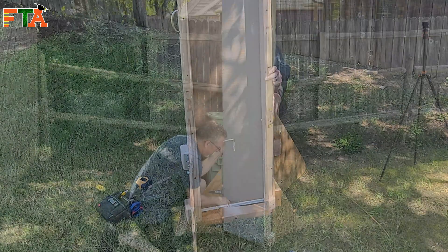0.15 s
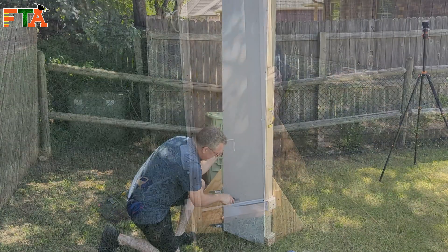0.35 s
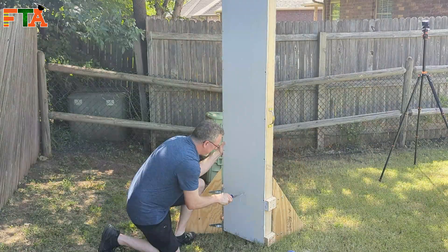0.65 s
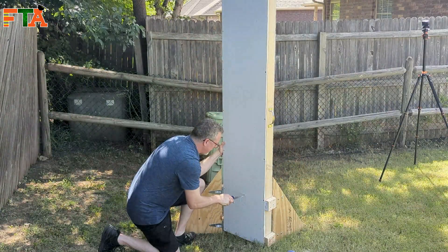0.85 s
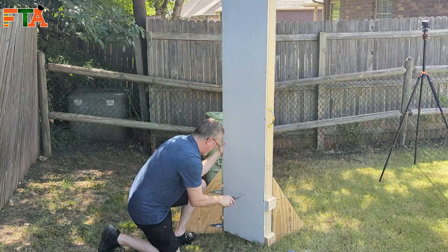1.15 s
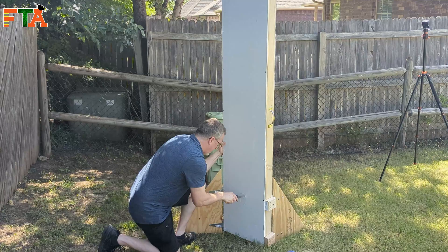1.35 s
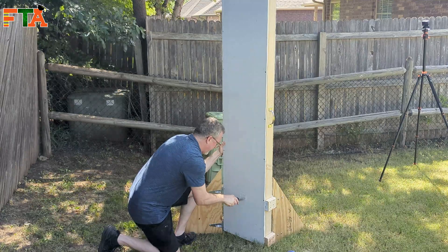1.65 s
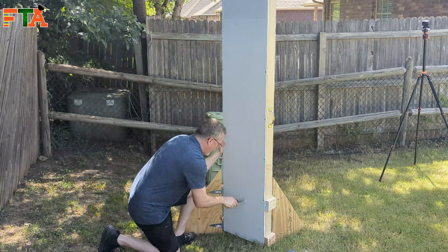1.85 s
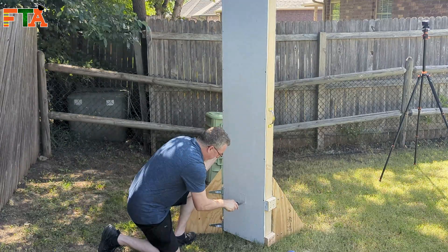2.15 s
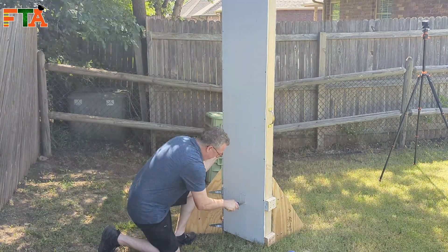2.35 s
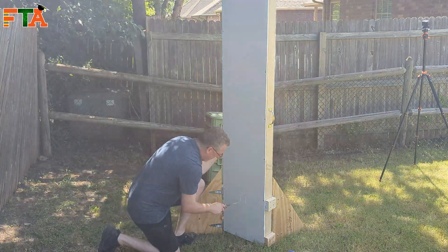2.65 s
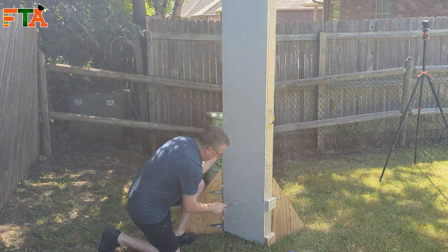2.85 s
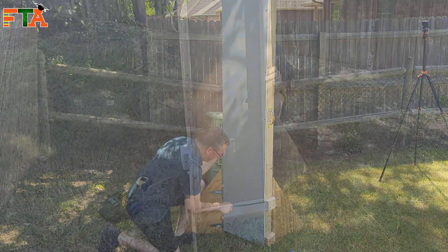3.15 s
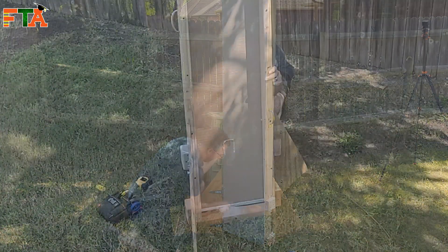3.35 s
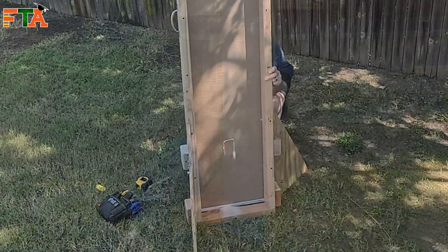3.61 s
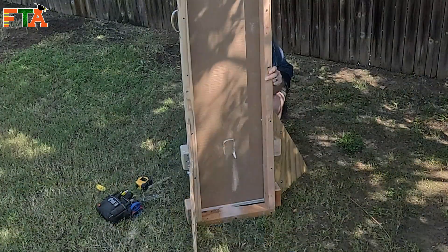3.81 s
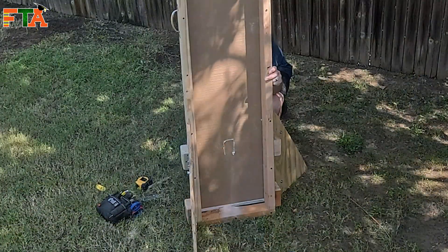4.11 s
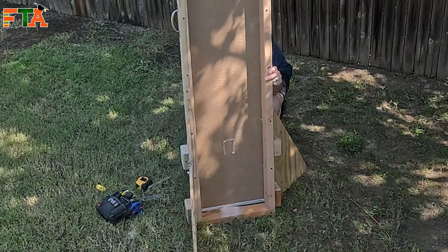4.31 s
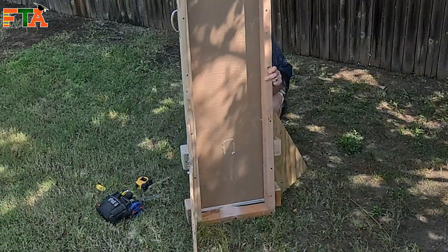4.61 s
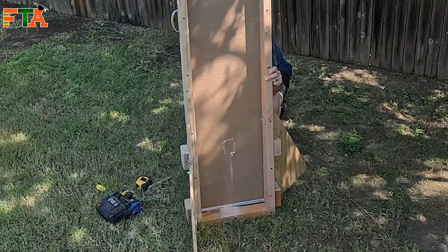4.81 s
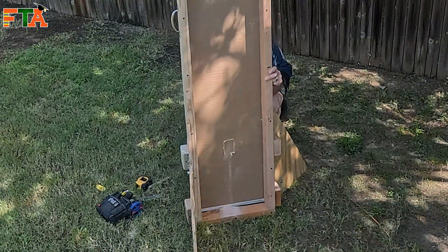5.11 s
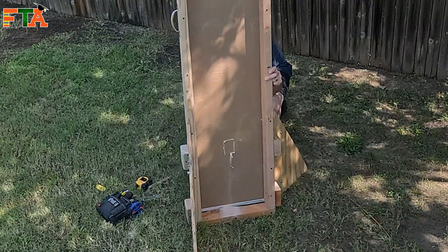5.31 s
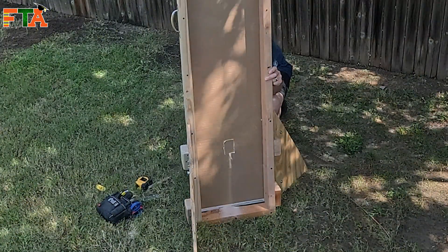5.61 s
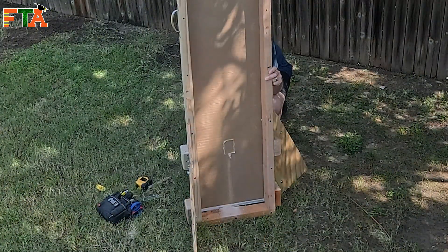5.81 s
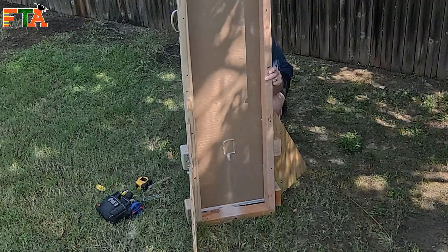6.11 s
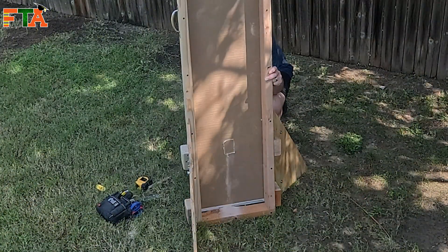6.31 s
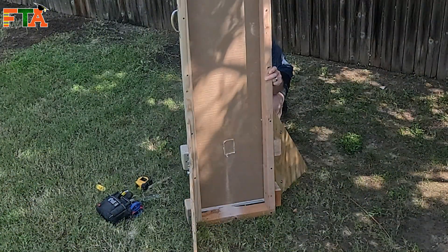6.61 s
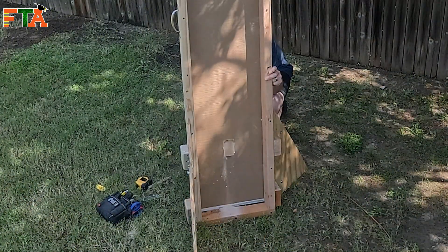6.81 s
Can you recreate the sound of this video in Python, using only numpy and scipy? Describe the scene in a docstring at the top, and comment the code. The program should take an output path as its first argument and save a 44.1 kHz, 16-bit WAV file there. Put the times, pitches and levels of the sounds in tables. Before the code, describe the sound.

In a quiet yard, a pointed saw jabs at a hollow drywall panel: faint ticks, a short scratchy burst, then a longer run of fast, even to-and-fro scrapes that fades out. After a soft bump and thin rustling, the sound shifts behind the panel, where fuller sawing begins, each stroke a buzzing rasp with hollow boom, thuds and snapping chips. Two bright squeaks chirp midway. Close, mono, with a faint dull outdoor echo.

```python
"""Jab saw on a hollow drywall

A stud wall stands in a quiet yard. From the front, the saw's tip scratches to and fro in short jabs.
From behind, longer strokes follow: a train of tooth impulses drives the modes of sheet and frame,
and noise grains make the gypsum's rasp. Chips snap as dispersive bending waves, bites thud, and
stick-slip squeaks are chirps. Filtered noise forms the air, a decaying noise tail the fences' echo."""
import sys
import numpy as np
from scipy import signal
from scipy.fft import rfft, irfft, next_fast_len
from scipy.io import wavfile
from scipy.ndimage import uniform_filter1d, map_coordinates

SR = 44100
rng = np.random.default_rng(int(sys.argv[2]) if len(sys.argv) > 2 else 0)


def digitize_waveform(pressure):
    """Quantize a signal to 16-bit integers and store it at the path in sys.argv[1].

    Rows of a 2-D input are taken as channels; values are limited to [-1, 1].
    """
    field = np.atleast_2d(pressure).T
    bounded = np.clip(field, -1, 1)
    quanta = np.round(bounded * 32767).astype(np.int16)
    wavfile.write(sys.argv[1], SR, quanta)


N = 306936
TIME = np.arange(N) / SR


def amp(db):
    """Decibels express the logarithm of an amplitude ratio."""
    return 10 ** (np.asarray(db) / 20)


def unit(x):
    """Normalization to an rms of 1 separates a signal's level from its shape."""
    return x / np.sqrt(np.mean(x ** 2) + 1e-20)


def along(points, hz):
    """Interpolation on a logarithmic frequency axis joins (hz, value) points."""
    point_hz, values = np.transpose(points)
    return np.interp(np.log(hz + 1), np.log(point_hz + 1), values)


def filtered(x, response):
    """A linear filter multiplies the spectrum by a response of frequency."""
    size = next_fast_len(len(x) + SR // 2)
    hz = np.fft.rfftfreq(size, 1 / SR)
    return irfft(rfft(x, size) * response(hz), size)[:len(x)]


def through(x, response):
    """Convolution passes x through an impulse response scaled to unit energy."""
    return signal.fftconvolve(x, response / np.linalg.norm(response))[:N]


def add(track, s, sound):
    """Superposition mixes a sound into the track at time s."""
    start = max(round(s * SR), 0)
    part = track[start:start + len(sound)]
    part += sound[:len(part)]


def click(spectrum, size=8192):
    """Minimum phase, by cepstral folding: a causal impulse of unit energy with this spectrum."""
    magnitude = amp(along(spectrum, np.fft.rfftfreq(size, 1 / SR)))
    cepstrum = irfft(np.log(np.maximum(magnitude, 1e-6)))
    cepstrum[1:size // 2] *= 2
    cepstrum[size // 2 + 1:] = 0
    pulse = irfft(np.exp(rfft(cepstrum)))
    return pulse / np.linalg.norm(pulse)


def ringing(modes, size=16384):
    """Modal superposition: damped sines, neighbours opposite in sign, unit energy in all."""
    t = np.arange(size) / SR
    ring = np.zeros(size)
    for k, (hz, db, t60) in enumerate(modes):
        ring += (-1) ** k * amp(db - 60 * t / t60) * np.sin(2 * np.pi * hz * t)
    return ring / np.linalg.norm(ring)


def crumbs(rate, scatter_db):
    """Granular noise: gypsum grains break at random moments with random strengths, rms 1."""
    size = amp(scatter_db * np.clip(rng.standard_normal(N), -2, 2))
    breaks = rng.random(N) < rate / SR
    return unit(breaks * size * rng.choice([-1, 1], N))


def wobble(rate):
    """Random modulation: a smooth curve through normal knots, rate of them a second."""
    knots = rng.standard_normal(int(N * rate / SR) + 4)
    return map_coordinates(knots, [TIME * rate])


def hush(levels, spectrum, patchy_db):
    """Filtered noise: outdoor rumble and hiss, wavering in patches of time and frequency."""
    z = signal.stft(rng.standard_normal(N), nperseg=512)[2]
    field = uniform_filter1d(rng.standard_normal(z.shape), size=5, axis=0)
    field = uniform_filter1d(field, size=9, axis=1)
    patches = signal.istft(z * amp(patchy_db * unit(field)), nperseg=512)[1][:N]
    air = unit(filtered(patches, lambda hz: amp(along(spectrum, hz))))
    return amp(np.interp(TIME, *np.transpose(levels)) + 0.23 * wobble(24)) * air


# level of the yard's air at the opening, in front and behind: time_s, level_db
OPENING_LEVELS = [(0, -57.5), (.22, -61), (.245, -96), (.28, -110)]
FRONT_LEVELS = [(.17, -110), (.215, -64.5), (.9, -70), (2.7, -68), (3.345, -69.5), (3.39, -110)]
BACK_LEVELS = [(3.3, -110), (3.345, -65), (3.6, -66), (3.85, -64.5), (6.96, -63.5)]
# spectrum of the air in each of these: frequency_hz, relative_level_db
OPENING_AIR = [(18, -56), (30, -18), (54, -12), (164, -9.5), (345, -15.5), (383, -25), (482, -14.5),
               (640, -21), (786, -22), (1040, -37), (2920, -34), (6150, -25), (11700, -48), (14000, -54)]
FRONT_AIR = [(35, -78), (60, -31), (153, -24.5), (338, -13.5), (398, -10.5), (437, -12.5), (566, -13.5),
             (1200, -24.5), (1510, -30.5), (2770, -30.5), (5210, -41.5), (16000, -49)]
BACK_AIR = [(30, -24), (85, 2), (200, -0.5), (400, -7.5), (650, -5.5), (1200, -18), (2000, -20),
            (3000, -20), (3900, -15.5), (4700, -14.5), (6000, -18), (9000, -27), (14000, -37.5)]


def yard():
    """Ambient noise depends on the standpoint: each air has its own spectrum and level curve."""
    opening = hush(OPENING_LEVELS, OPENING_AIR, patchy_db=4.0)
    front = hush(FRONT_LEVELS, FRONT_AIR, patchy_db=2.5)
    back = hush(BACK_LEVELS, BACK_AIR, patchy_db=2.2)
    return opening + front + back


def fences(x, level_db=-23, delay_s=0.064, t60_s=1, corner_hz=800):
    """Late reflection: the fences around the yard send back a faint, dull, decaying tail."""
    t = TIME[:SR // 2]
    tail = rng.standard_normal(len(t)) * amp(-60 * t / t60_s) * (t > delay_s)
    return amp(level_db) * filtered(through(x, tail), lambda hz: 1 / (1 + (hz / corner_hz) ** 2))


# the blade skims the face with hardly any pressure: start_s, end_s, level_db
GRAZES = [(0.232, 0.262, -70.5), (0.967, 1.186, -71), (3.022, 3.203, -73), (3.168, 3.35, -71)]
# single teeth skip over the paint: start_s, level_db
SKIPS = [(0.253, -57), (0.288, -56), (0.305, -56), (0.99, -67), (1.023, -67), (1.052, -62), (1.098, -66),
         (1.169, -65), (3.051, -68), (3.066, -61), (3.076, -64), (3.108, -65), (3.129, -69), (3.151, -66),
         (3.17, -61), (3.178, -66), (3.214, -57), (3.227, -63), (3.253, -60.5), (3.274, -55), (3.304, -58),
         (3.316, -57)]
# spectrum of the light scratching: frequency_hz, relative_level_db
GRAZE_COLOUR = [(400, -19), (900, 1.5), (1400, -10.5), (2000, 1), (2500, -10), (3300, -13), (5000, -22.5),
                (8700, -21.5), (16000, -21)]


def grazes(skip_t60_s=0.031):
    """Light friction: noise grains under a pressure curve give scratches over a thin rustle."""
    pressure, t = np.zeros(N), TIME[:SR // 20]
    for start, end, db in GRAZES:
        add(pressure, start, amp(db) * signal.windows.tukey(int((end - start) * SR), .3))
    for s, db in SKIPS:
        add(pressure, s, amp(db - 60 * t / skip_t60_s))
    return through(pressure * crumbs(rate=2200, scatter_db=4.0), click(GRAZE_COLOUR))


# the handle bumps softly against the face: start_s, peak_db
BUMPS = [(2.781, -50.5)]
# modes of the painted face, stirred by bumps and by the tip: frequency_hz, level_db, t60_s
FACE_MODES = [(251, 0, 0.12), (342, 0.5, 0.14), (681, 6.5, 0.041), (837, -4, 0.073), (1197, 3, 0.051),
              (1850, -25.5, 0.05), (1933, -6, 0.099)]


def bumps():
    """Selective excitation: a soft contact favours the face's modes around 800 Hz."""
    thud = filtered(ringing(FACE_MODES), lambda hz: np.exp(-np.log((hz + 1) / 800) ** 2 / 0.16))
    out = np.zeros(N)
    for s, db in BUMPS:
        add(out, s, amp(db) * thud / np.abs(thud).max())
    return out


def board(x, spectrum, decay, tail_db, size=8192):
    """Diffuse reverberation: x gains a dense tail, redrawn every size / 2 samples, and a colour."""
    tails = np.zeros(N)
    for start in range(0, N, size // 2):
        piece = x[start:start + size // 2]
        if piece.any():
            hz, t, z = signal.stft(rng.standard_normal(size), SR, nperseg=128)
            t60 = along(decay, hz)[:, None]
            # equal energy in every band, however long it rings
            z = z * amp(-60 * t / t60) / np.sqrt(t60)
            tail = signal.istft(z, SR, nperseg=128)[1]
            add(tails, start / SR, signal.fftconvolve(piece, tail / np.linalg.norm(tail)))
    mixed = (x + amp(tail_db) * tails) / np.hypot(1, amp(tail_db))
    return through(mixed, click(spectrum))


def cutting(rate, jitter, puff_db, uneven_db):
    """Periodic impulses shed grains: returns teeth passed, their pulses and the puffs of crumbs."""
    travel = np.cumsum(rate * np.exp(jitter * wobble(140))) / SR
    passing = np.diff(np.floor(travel), prepend=0)
    # pulses and puffs both come out near rms 1
    teeth = passing * np.sqrt(SR / np.maximum(rate, 1)) * amp(0.46 * wobble(200))
    puff_fall = amp(-puff_db * (travel % 1) + uneven_db * wobble(250))
    puffs = crumbs(rate=11000, scatter_db=2) * puff_fall
    # the hand keeps a steady pressure over a few teeth
    pressure = np.sqrt(np.abs(uniform_filter1d(puffs ** 2, size=400)) + 1e-6)
    return travel, teeth, puffs / pressure


# quick to-and-fro jabs of the tip: full_speed_s, level_db, length_s
JABS = [(0.382, -41, 0.011), (0.418, -45.5, 0.021), (0.48, -36, 0.017), (0.507, -34, 0.01),
        (0.536, -39.5, 0.017), (0.564, -37, 0.017), (0.599, -36, 0.02), (0.657, -43.5, 0.015),
        (1.135, -55, 0.0096), (1.264, -28.5, 0.023), (1.288, -38, 0.02), (1.34, -33, 0.019),
        (1.372, -38.5, 0.012), (1.407, -37.5, 0.018), (1.441, -29, 0.022), (1.476, -31.5, 0.013),
        (1.511, -30, 0.015), (1.547, -31, 0.014), (1.58, -29, 0.013), (1.618, -29, 0.015),
        (1.647, -26.5, 0.014), (1.683, -34, 0.014), (1.715, -29, 0.018), (1.75, -33.5, 0.014),
        (1.786, -30, 0.017), (1.822, -32, 0.02), (1.855, -29, 0.015), (1.892, -31, 0.013),
        (1.929, -32.5, 0.02), (1.961, -38.5, 0.013), (1.999, -31, 0.016), (2.031, -38, 0.013),
        (2.071, -30.5, 0.018), (2.103, -30, 0.012), (2.137, -31, 0.016), (2.174, -33, 0.018),
        (2.199, -38, 0.022), (2.232, -45, 0.015), (2.26, -45.5, 0.017), (2.299, -39.5, 0.015),
        (2.325, -38, 0.022), (2.389, -44, 0.017), (2.433, -42, 0.017), (2.467, -42, 0.02),
        (2.492, -42, 0.0095), (2.54, -45, 0.024)]
# the tip knocks as it is set down or turns round: start_s, level_db (before the tap gains)
TAPS = [(0.371, -30), (0.409, -30), (0.46, -34), (1.133, -53), (1.21, -26.5), (1.233, -31), (1.259, -22),
        (1.325, -36), (1.4317, -25), (1.471, -28), (1.499, -34), (1.5362, -24), (1.567, -26), (1.602, -36),
        (1.635, -33), (1.676, -28), (1.709, -27.5), (1.779, -27), (1.8195, -24), (1.849, -15), (1.883, -20),
        (1.989, -50), (2.058, -26)]
# spectra of the scraped face and of the flying grit: frequency_hz, relative_level_db
SCRAPE_COLOUR = [(41, -76), (70, -41), (176, -24.5), (259, -1), (348, -6), (484, -7.5), (662, -1.5),
                 (860, 2), (1080, -11), (1200, -8.5), (1380, -11.5), (1950, -3.5), (2620, -17),
                 (3010, -10.5), (4500, -31.5), (5850, -63), (9900, -120)]
GRIT_COLOUR = [(2060, -41), (3500, 2), (4550, -8), (5050, -3.5), (6300, -12), (6900, -9), (7900, -12),
               (8900, -4), (9450, -11.5), (10200, -11), (12800, -9.5), (16000, -16.5)]
# how long the face rings: frequency_hz, t60_s
FACE_RING = [(200, 0.019), (1000, 0.19), (4000, 0.018), (12000, 0.033)]


def jabs(grit_tail_db=-8, face_tail_db=-7, modes_db=-8, pulse_share=0.24):
    """Impulsive friction: evenly spaced teeth knock the face and throw crisp puffs of grit."""
    drag_lead_s = 0.0013  # the face takes the load this long before the grit flies
    fall_ratio, roundness = 0.84, 1.626  # a jab's fall against its rise, and its shape
    grit_db = -13.5  # grit against scrape
    tap_db, tap_grit_db = 9, -17.5  # a tap's blow to the face, and its grit against that blow
    grit_power, drag_power, taps = np.zeros((3, N))
    for s, db, length in JABS:
        near = slice(int((s - .1) * SR), int((s + .1) * SR))
        for power, middle in ((grit_power, s), (drag_power, s - drag_lead_s)):
            before, after = middle - TIME[near], (TIME[near] - middle) / fall_ratio
            away = np.maximum(before, after) / (length / 2)
            power[near] += amp(db) ** 2 * np.exp(-away ** roundness)
    for s, db in TAPS:
        add(taps, s, amp([db + tap_db]))
    teeth_hz = np.full(N, 315)
    _, teeth, breaking = cutting(teeth_hz, jitter=.06, puff_db=17, uneven_db=3.5)
    drag = unit(breaking + pulse_share * teeth) * np.sqrt(drag_power) * amp(-1.07) + taps
    face = board(drag, SCRAPE_COLOUR, FACE_RING, tail_db=face_tail_db)
    face = face + amp(modes_db) * through(drag, ringing(FACE_MODES))
    # the small patch around the tip hardly radiates bass
    face = filtered(face, lambda hz: 1 - 1 / (1 + (hz / 150) ** 3))
    grit = amp(grit_db) * breaking * np.sqrt(grit_power) + amp(tap_grit_db) * taps
    dust = board(grit, GRIT_COLOUR, FACE_RING, tail_db=grit_tail_db)
    return amp(-1.5) * face + amp(1.0) * dust


# chirps of the binding blade: middle_s, length_s, pitch_hz (at the middle), peak_db
SQUEAKS = [(5.2533, 0.0094, 5096, -13.5), (5.285, 0.013, 5090, -41), (5.303, 0.016, 5150, -38),
           (5.321, 0.0043, 5870, -37), (5.328, 0.0091, 5040, -14), (5.628, 0.007, 5050, -32.5)]


def squeaks(droop=0.039, second_db=-27, third_db=-42, ring_db=-26, t60=0.14):
    """Stick-slip: brief, nearly pure chirps sag in pitch and leave a faint ring."""
    out = np.zeros(N)
    for s, length, hz, db in SQUEAKS:
        u = np.linspace(-1, 1, int(length * SR))
        phase = 2 * np.pi * np.cumsum(hz * (1 - droop * u)) / SR
        tone = np.sin(phase) + amp(second_db) * np.sin(2 * phase) + amp(third_db) * np.sin(3 * phase)
        add(out, s - length / 2, amp(db) * np.cos(np.pi * u / 2) ** 2 * tone)
    t = TIME[:SR // 4]
    ring = rng.standard_normal(len(t)) * amp(-60 * t / t60)
    return out + amp(ring_db) * through(out, ring)


# the teeth bite into the cut's edge and thump the wall: start_s, level_db
BITES = [(3.617, -30), (3.636, -24), (3.964, -40), (3.982, -34), (4.282, -40.5), (4.407, -30),
         (4.47, -24.5), (4.566, -34), (4.675, -25), (4.69, -25.5), (4.984, -23), (5.132, -34), (5.274, -36),
         (5.312, -33), (5.409, -29), (5.545, -28), (5.706, -32.5), (5.838, -23), (5.868, -24),
         (5.995, -25.5), (6.124, -26), (6.27, -25), (6.425, -21), (6.442, -24), (6.693, -21), (6.826, -30)]
# large chips of gypsum break off, heard as jolts and as snaps: start_s, level_db (before the gains of each)
SNAPS = [(3.6173, -33), (3.6313, -46), (3.7072, -33), (3.72, -23), (3.7303, -14.5), (3.7418, -25.5),
         (3.754, -24), (3.9974, -46), (4.0584, -33), (4.0721, -31), (4.085, -35.5), (4.3111, -38),
         (4.4248, -33), (4.467, -28), (4.479, -22.5), (4.493, -26), (4.5045, -24), (4.5738, -46),
         (4.6, -28), (4.6587, -40), (4.6746, -52), (4.6998, -31), (4.7123, -18.5), (4.729, -22),
         (4.7431, -20), (4.7553, -21.5), (4.7763, -28.5), (4.789, -37), (4.8419, -32), (4.8683, -23),
         (4.9224, -49), (4.935, -35.5), (4.984, -30), (5.0061, -24), (5.0234, -26), (5.034, -23),
         (5.057, -28), (5.2975, -29.5), (5.436, -27.5), (5.4622, -32.5), (5.4947, -36), (5.5073, -32.5),
         (5.565, -24.5), (5.5763, -27.5), (5.6225, -34), (5.6294, -26), (5.6453, -27.5), (5.659, -34),
         (5.7191, -29), (5.7504, -34), (5.7775, -29), (5.8488, -27), (5.8611, -21.5), (5.8699, -22),
         (5.904, -19), (6.0013, -27.5), (6.0147, -26.5), (6.0437, -33.5), (6.123, -46), (6.1374, -27.5),
         (6.1665, -28), (6.1815, -28), (6.2139, -19.5), (6.2707, -34), (6.2965, -29.5), (6.326, -29),
         (6.3684, -33), (6.4425, -47), (6.4696, -24.5), (6.4993, -25), (6.5129, -26), (6.7309, -24.5),
         (6.7477, -23), (6.759, -15), (6.7731, -19), (6.851, -30), (6.8638, -23)]
# spectrum of the dull push that a bite gives the sheet: frequency_hz, relative_level_db
THUD_COLOUR = [(30, -24), (65, 3), (200, -4.5), (550, 0.5), (1000, -34), (2500, -43)]
# the hollow wall's low modes, and the gypsum sheet's modes: frequency_hz, level_db, t60_s
FRAME_MODES = [(64, -9, 0.27), (83.1, -5, 0.31), (122.6, -0.5, 0.088), (156, 0, 0.19), (185.6, -6.5, 0.27),
               (212.4, 1, 0.17), (243, -4.5, 0.14)]
SHEET_MODES = [(306.6, 1.5, 0.28), (350, -13, 0.078), (426, -1.5, 0.056), (490.3, 5.5, 0.2),
               (554, 0.5, 0.16), (632, -7.5, 0.13), (701.5, -5, 0.2), (768.3, -3.5, 0.18),
               (920, -8.5, 0.062), (1279, -12.5, 0.2), (1720, -10, 0.04)]


def snags(push_db=-8, ring_db=-3, jolt_db=-11):
    """Impact excitation: bites, and the release of large chips, push the sheet and ring the wall."""
    ring = ringing(FRAME_MODES) + amp(-4.0) * ringing(SHEET_MODES)
    push = click(THUD_COLOUR, size=16384)
    thud = amp(ring_db) * ring / np.abs(ring).max() + amp(push_db) * push / np.abs(push).max()
    jolts = [(s, db + jolt_db) for s, db in SNAPS]
    out = np.zeros(N)
    for s, db in BITES + jolts:
        add(out, s, amp(db) * thud)
    return out


# spectrum of a snap: frequency_hz, relative_level_db
SNAP_COLOUR = [(300, 16.5), (900, 10.5), (2000, 5.5), (4000, 5.5), (6000, -3), (9000, -19), (16000, -68)]


def bending_wave(lag=0.0028, t60=0.16, count=20, size=4096):
    """Dispersion, peak 1: treble arrives first, and the edges send back slower, duller copies."""
    hz = np.fft.rfftfreq(size, 1 / SR)
    echoes = 1.4 + .45 * (np.arange(count) + rng.random(count))
    paths = np.append(1, echoes)[:, None]  # lengths relative to the direct path
    # phase grows with the root of frequency, so group delay falls with it
    phase = 4 * np.pi * lag * paths * np.sqrt(1000 * hz)
    loss = amp(-60 * lag * (paths - 1) / t60 * np.sqrt(hz / 4000)) / paths ** 0.76
    wave = irfft(amp(along(SNAP_COLOUR, hz)) * np.sum(loss * np.exp(-1j * phase), axis=0))
    return wave / np.abs(wave).max()


# strokes, a hard push and a lighter pull in turn, at times a short nudge between; relative levels:
# start_s, end_s, teeth_hz, force_db, dust_db, swell_db (over the stroke), drumming_db,
# frame_boom_db, sheet_ring_db
STROKES = [(3.616, 3.719, 205, -28.5, -31, -0.5, -25, -29, -32.5),
           (3.932, 4.067, 146, -42, -44, 4, -44.5, -36.5, -49),
           (4.085, 4.118, 85, -50.5, -46.5, 0, -43, -39, -50.5),
           (4.239, 4.331, 200, -48.5, -50.5, 3, -58, -42, -63),
           (4.341, 4.374, 83, -54, -52.5, 0, -55, -48, -52),
           (4.395, 4.516, 168, -40.5, -39.5, -4, -44, -38.5, -41),
           (4.535, 4.633, 177, -40.5, -45.5, -8, -39, -35, -45),
           (4.671, 4.782, 160, -34, -36.5, -6, -33.5, -30.5, -37.5),
           (4.819, 4.918, 89, -40, -44.5, -4, -38, -34.5, -41),
           (4.943, 4.974, 85, -40.5, -46, -7, -44, -38, -44),
           (4.977, 5.051, 185, -34, -35.5, -6.5, -40, -31, -37.5),
           (5.091, 5.204, 181, -46.5, -44.5, 4, -52, -41.5, -57),
           (5.283, 5.349, 99, -43.5, -43.5, 3, -59, -46, -57),
           (5.378, 5.53, 165, -44, -45.5, -5, -49, -38.5, -51.5),
           (5.538, 5.647, 165, -33.5, -36, -1, -27, -34, -37),
           (5.665, 5.787, 173, -41.5, -45, -4, -41, -36, -43.5),
           (5.819, 5.916, 178, -34.5, -36, -4, -36, -34, -40.5),
           (5.95, 6.072, 155, -40, -45, 4.5, -36, -38, -49),
           (6.084, 6.115, 84, -44, -49.5, 16, -58, -42, -46),
           (6.114, 6.222, 160, -33, -34, -3, -26, -34.5, -34.5),
           (6.25, 6.374, 161, -40, -44, -1, -40.5, -36, -41.5),
           (6.388, 6.417, 97, -45.5, -48.5, 3, -45, -40, -50),
           (6.421, 6.516, 155, -33, -39.5, -9, -40, -37, -34),
           (6.537, 6.654, 114, -42.5, -46, -2.5, -63, -38.5, -48),
           (6.683, 6.786, 192, -30.5, -36.5, 3, -36.5, -40, -40),
           (6.802, 6.893, 196, -41, -46, 9, -50, -43, -39.5)]


def snaps(chip_hz=21.65, chip_db=-4, chip_from=0.3):
    """Brittle fracture: large chips snap, and small ones at random later in each stroke."""
    out = np.zeros(N)
    for s, db in SNAPS:
        add(out, s, amp(db - 6.0) * bending_wave())
    for start, end, _, force_db, *_ in STROKES:
        # chip_from is the share of the stroke that passes first
        for s in np.arange(start + chip_from * (end - start), end, 1 / chip_hz):
            add(out, s + .5 * rng.random() / chip_hz, amp(force_db + chip_db) * bending_wave())
    return out


def slide(force_db):
    """Friction before the bite: seconds of sliding, longer by 2.2 ms per dB below a firm -35.5 dB."""
    return 0.019 + 0.0022 * max(-35.5 - force_db, 0)


def stroke_controls(rise, fall, slowing):
    """Kinematics: the blade slows at both ends of a stroke, then its last teeth bump over the edge."""
    slide_db, slide_boom_db = -2, -3.5  # force and boom while sliding, against those after the bite
    drum_peaks_at = 0.39  # share of the stroke at which the teeth drum hardest
    boom_start_db, boom_fall_db = 10.5, 7  # the boom's lift at the start, and its fall over a stroke
    run_out_s, run_out_hz = 0.06, 86.94  # how long the last teeth bump, and how many a second
    run_out_db, run_out_fade_db, run_out_dust_db = 0.5, -25.5, -44  # force, its fall, their dust
    rate, force, rasp, drum, boom, ring = np.zeros((6, N))
    for start, end, teeth_hz, db, dust_db, swell_db, drum_db, boom_db, ring_db in STROKES:
        near = slice(int(start * SR), int(end * SR))
        t = TIME[near]
        u = np.clip((t - start) / (end - start), 0, 1)
        contact = np.clip((t - start) / rise, 0, 1) * np.clip((end - t) / fall, 0, 1)
        speed = 1 - np.clip(slowing, 0, .9) * (2 * u - 1) ** 2
        drag = unit(contact * speed ** 7.7 * amp(swell_db * (u - .5)))
        sliding = t < start + slide(db)
        grip = amp(slide_db * sliding)
        rate[near] = teeth_hz * speed
        force[near] = amp(db) * grip * drag
        rasp[near] = amp(dust_db) * drag
        ring[near] = amp(ring_db) * grip * drag
        arch = np.interp(u, [0, drum_peaks_at, 1], [0, 1, 0])
        drum[near] = amp(drum_db) * np.sin(np.pi / 2 * arch) ** 1.05
        boom_level_db = boom_db + boom_start_db - boom_fall_db * u + slide_boom_db * sliding
        boom[near] = contact * amp(boom_level_db)
        after = slice(int(end * SR), int((end + run_out_s) * SR))
        fade = amp(run_out_fade_db * (TIME[after] - end) / run_out_s)
        rate[after] = run_out_hz
        force[after] = amp(db + run_out_db) * fade
        rasp[after] = amp(dust_db + run_out_dust_db) * fade
    return rate, force, rasp, drum, boom, ring


def tooth_ticks(blows, tick_db=-17.5, scatter_db=5):
    """Impulse response of a plate: each tooth ticks on freshly drawn paths, some much harder."""
    blows = blows * amp(tick_db + scatter_db * np.clip(wobble(200), -2, 1.7))
    out = np.zeros(N)
    for at in np.flatnonzero(blows):
        wave = bending_wave(count=6, size=2048)
        add(out, at / SR, blows[at] * wave / np.linalg.norm(wave))
    return out


# the blade's top resonance, before and after the cut turns: frequency_hz, level_db, t60_s
TOP_BEFORE = [(9780, 0, 0.0047)]
TOP_AFTER = [(8260, 0, 0.0035)]


def blade_top(dust, turn_s=5.97, level_db=-20.5):
    """Resonance: rasping dust stirs a high mode that drops as the cut turns along the next side."""
    turned = TIME > turn_s
    before = amp(-8.5) * through(dust * ~turned, ringing(TOP_BEFORE))
    after = through(dust * turned, ringing(TOP_AFTER))
    return amp(level_db) * (before + after)


# spectra of the knocked board and of the rasping dust: frequency_hz, relative_level_db
BOARD_COLOUR = [(150, -28.5), (250, -3), (400, 0), (520, 3), (660, -6), (900, -8), (1100, -23), (1300, -13),
                (1600, -32), (2200, -14.5), (2650, -25), (3500, -22.5), (4300, -31.5), (5500, -62.5)]
RASP_COLOUR = [(2500, -16), (3400, -6), (3770, -9), (4200, -4), (5100, -0.5), (6000, 4), (7200, -6.5),
               (8600, -9), (10000, -18.5), (13000, -20), (16000, -43)]
# how long the board rings: frequency_hz, t60_s
BOARD_RING = [(250, 0.4), (600, 0.23), (1500, 0.28), (4000, 0.015), (12000, 0.0047)]
# modes of the steel blade, damped by the cut: frequency_hz, level_db, t60_s
BLADE_MODES = [(5110, 3.5, 0.0071), (6070, 0.5, 0.011)]


def strokes(fine_hz=8500, sing_db=7.5, sing_growth=1.563):
    """Forced vibration: teeth strike the cut's edge in turn, shake the wall and shed crumbs."""
    rate, force, rasp, drum, boom, ring = stroke_controls(rise=0.0019, fall=0.013, slowing=.09)
    travel, teeth, breaking = cutting(np.maximum(rate, 60), jitter=.045, puff_db=4, uneven_db=5.5)
    # the sheet swings with the passing teeth, and the frame booms in its low modes
    swing = drum * amp(2.0 * wobble(83)) * np.sin(2 * np.pi * travel)
    frame = through(boom * (0.21 * teeth + .5 * breaking), ringing(FRAME_MODES))
    blows = 0.25 * teeth + 0.97 * breaking
    knock = amp(-1.5) * board(force * blows, BOARD_COLOUR, BOARD_RING, tail_db=0.5)
    knock = knock + through(ring * blows, ringing(SHEET_MODES))
    dust = board(rasp * breaking, RASP_COLOUR, BOARD_RING, tail_db=-2.5)
    # the finest dust dies first when the blade slows
    fine = filtered(dust, lambda hz: 1 - 1 / (1 + (hz / fine_hz) ** 6))
    moving = np.clip(uniform_filter1d(rate, size=1300) / 180, 0, 1.3)
    dust = dust + fine * (moving - 1)
    # the blade sings when pushed hard: its ring gains sing_growth dB per dB of dust
    sing = through(amp(sing_db) * rasp ** sing_growth * breaking, ringing(BLADE_MODES))
    wall = swing + amp(-2.5) * frame + amp(-0.5) * knock + tooth_ticks(force * teeth)
    return wall + amp(-9.5) * dust + sing + blade_top(rasp * breaking)


# gain of wall and yard, which dips briefly before the first squeak: time_s, gain_db
DIP = [(5.214, 0), (5.225, -18), (5.238, 1), (5.25, 1)]


def scene():
    """Superposition of saw and yard in one channel; squeaks and front sounds bypass the dip."""
    air = yard()
    sawing = strokes() + snags() + snaps()
    dip = amp(np.interp(TIME, *np.transpose(DIP)))
    front = jabs() + grazes() + bumps()
    return (front + squeaks() + dip * (sawing + fences(sawing) + air))[None]


def record(dry, low_hz=52, top_hz=15950):
    """Band limiting: a steep high-pass drops the deepest bass; nothing passes above top_hz."""
    low_cut = signal.butter(N=6, Wn=low_hz, btype="high", fs=SR, output="sos")
    return filtered(signal.sosfilt(low_cut, dry[0]), lambda hz: hz < top_hz)[None]


dry = scene()
out = record(dry)
digitize_waveform(out)
```